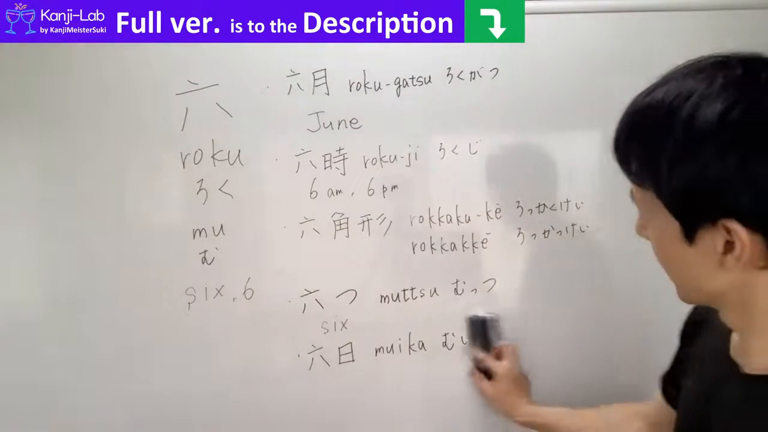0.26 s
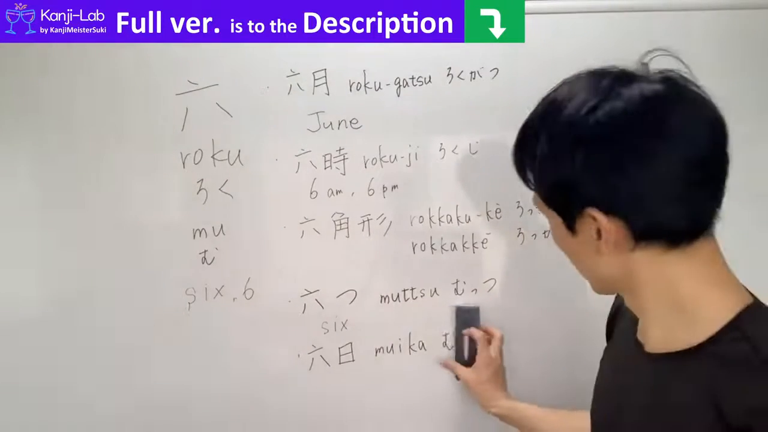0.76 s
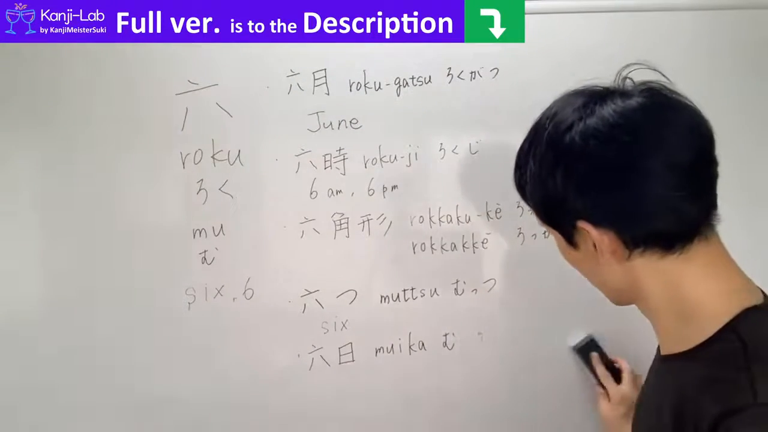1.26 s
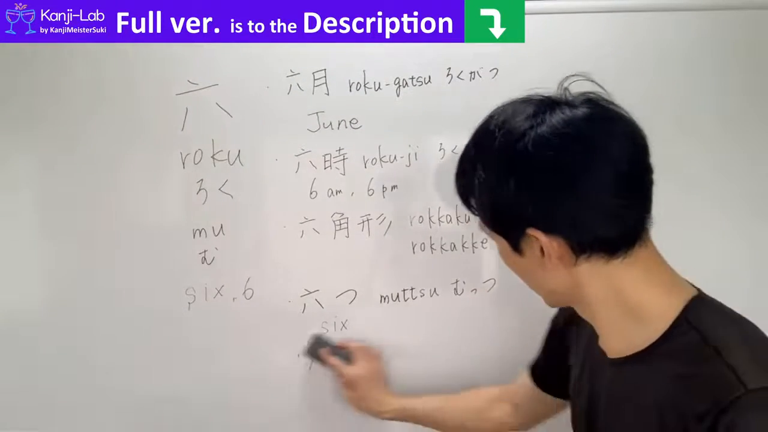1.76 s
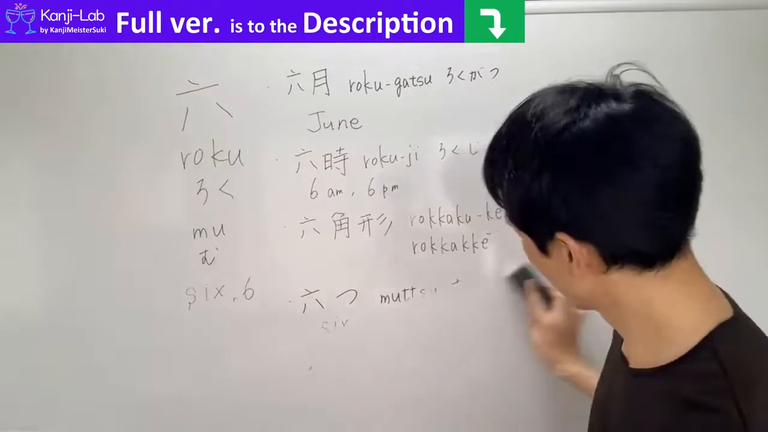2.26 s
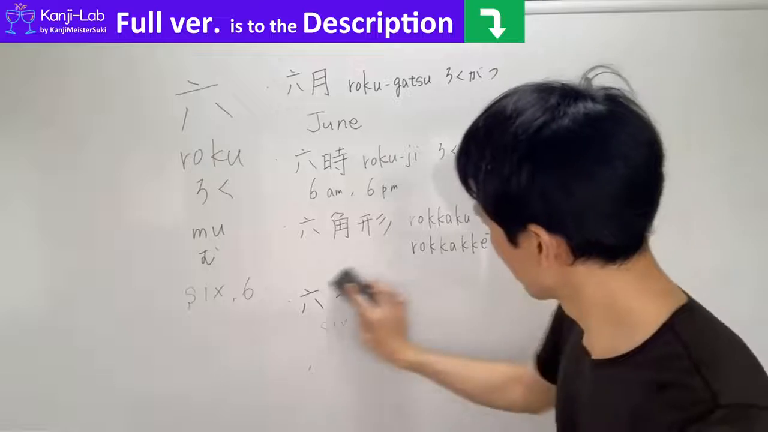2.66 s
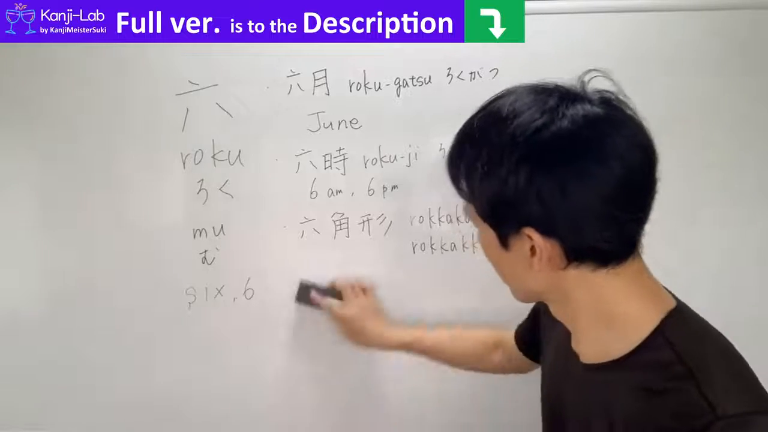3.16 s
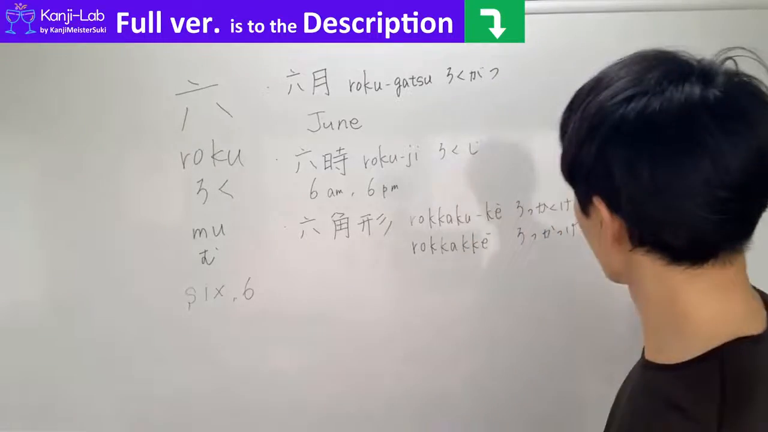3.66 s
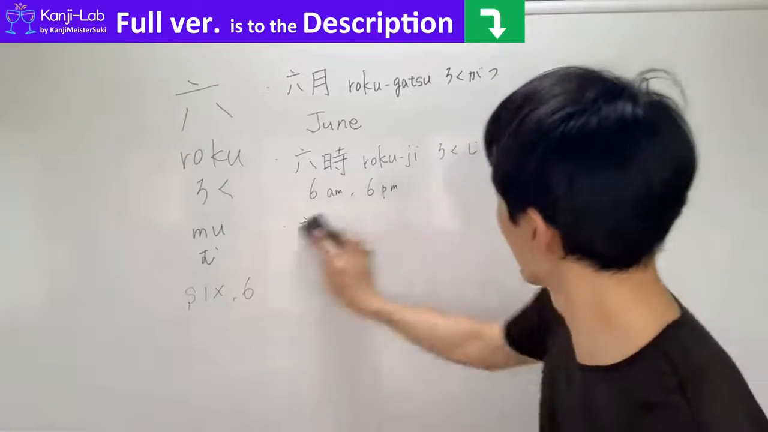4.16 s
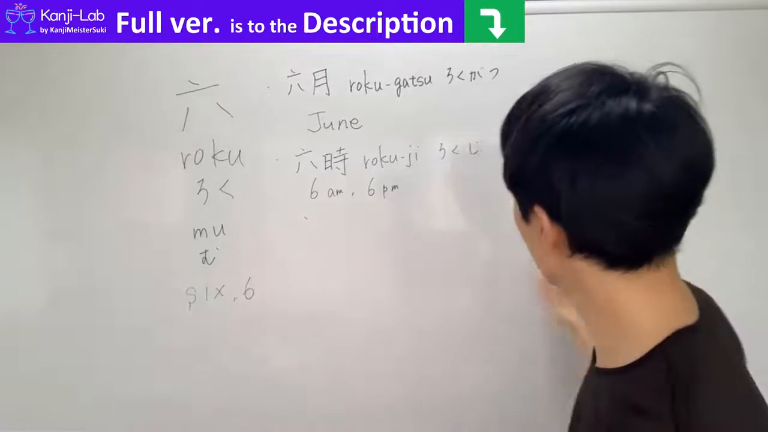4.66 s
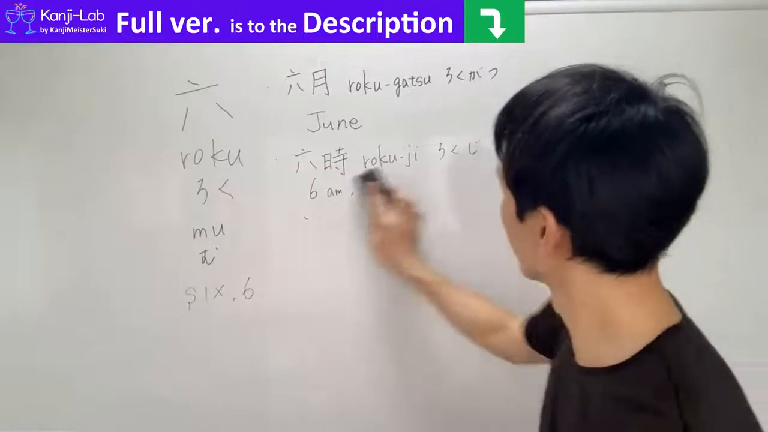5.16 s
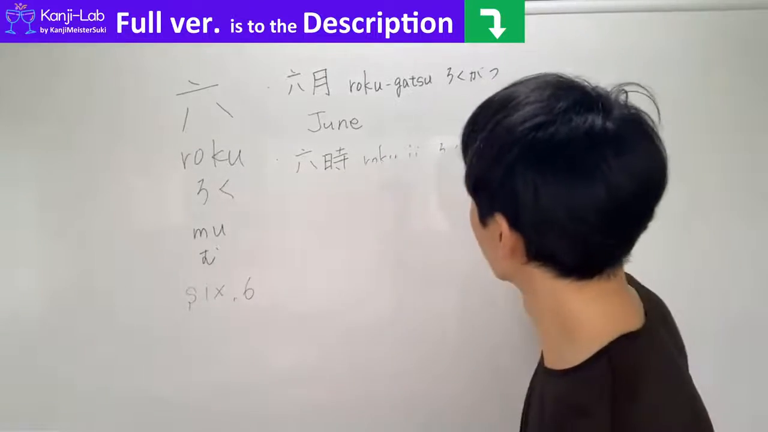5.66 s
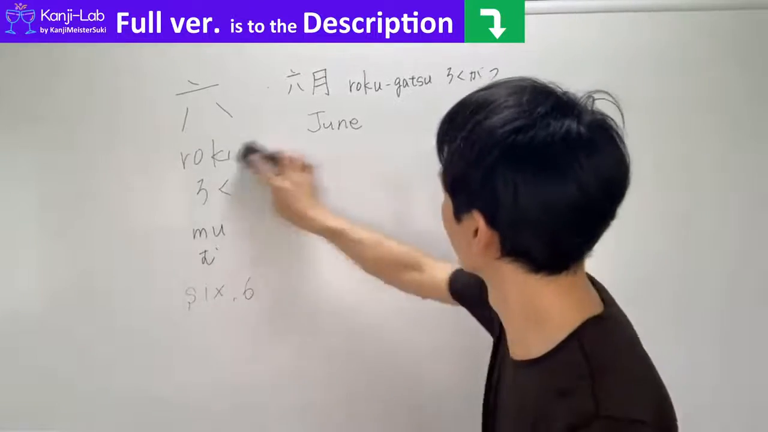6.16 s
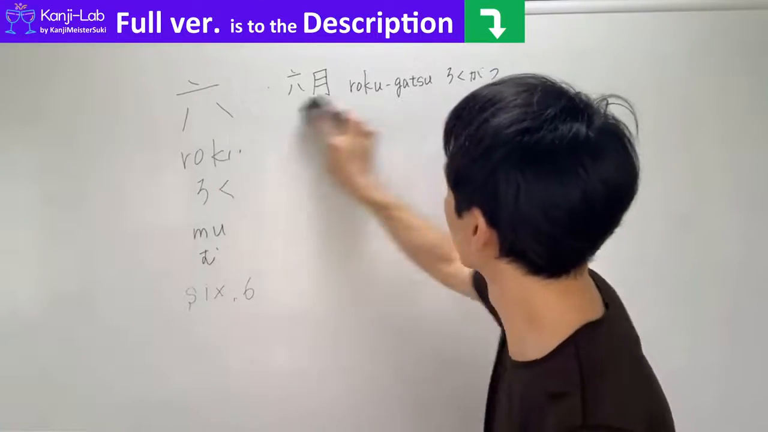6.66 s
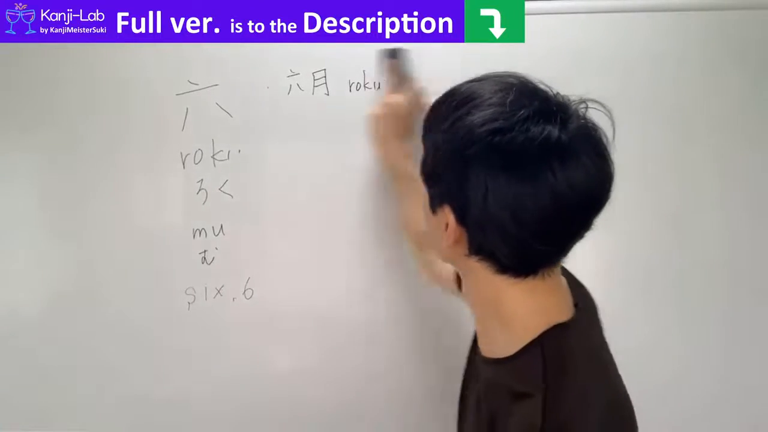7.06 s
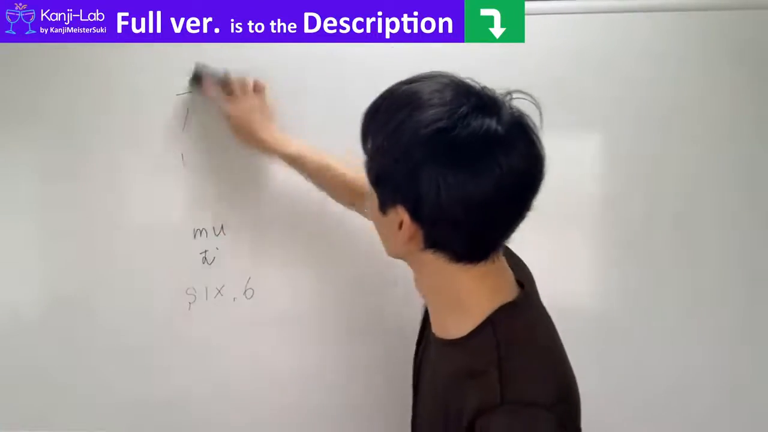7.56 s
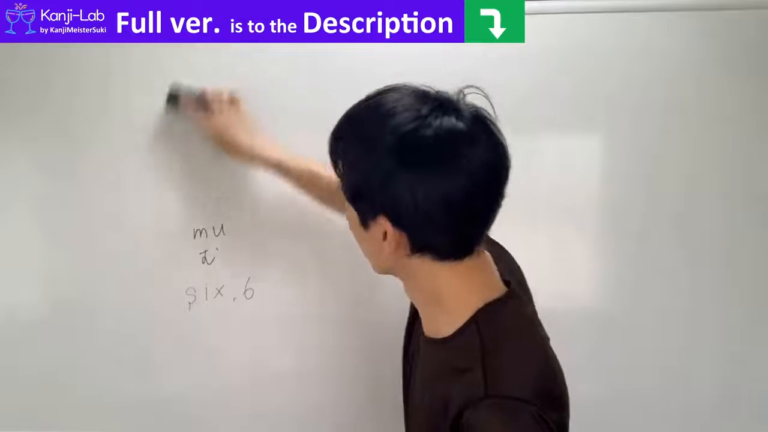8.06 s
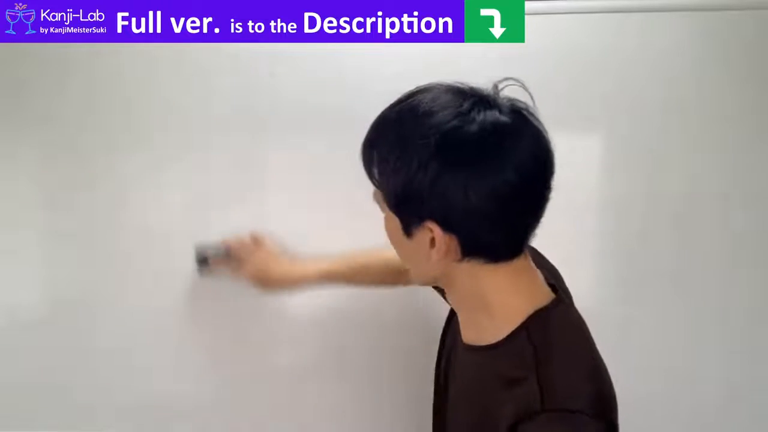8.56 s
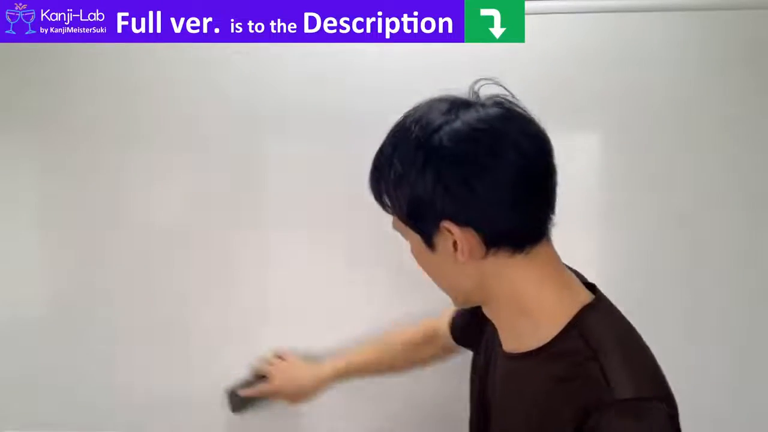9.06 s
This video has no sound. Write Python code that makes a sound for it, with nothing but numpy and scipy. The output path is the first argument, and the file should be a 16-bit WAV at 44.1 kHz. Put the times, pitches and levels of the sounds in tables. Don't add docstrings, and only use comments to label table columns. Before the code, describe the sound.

In a small hard room, faint rubbing leads to a loud, bouncing clack as an eraser hits a wall-hung whiteboard with a low boom. A brief scuffing squeak follows, then soft dry strokes sweep to and fro. The loose panel knocks dully at the turns, more often later. Close microphone, hollow comb-like colour, faint rumble and hiss beneath.

```python
import sys
import numpy as np
from scipy import signal
from scipy.fft import rfft, irfft, next_fast_len
from scipy.io import wavfile

SR = 44100
rng = np.random.default_rng(int(sys.argv[2]) if len(sys.argv) > 2 else 0)


def makeup_ratio(level_db):
    decades = np.asarray(level_db, float) / 20
    return 10 ** decades


def unload_wav(signal):
    wavfile.write(
        sys.argv[1],
        SR,
        np.round(np.clip(np.atleast_2d(signal).T, -1, 1) * 32767).astype(np.int16),
    )


N = 410130

# frequency in Hz, side minus mid in dB.
WIDTH = [(60, -29.5), (120, -12.5), (240, -18), (480, -10), (950, -13), (1890, -11), (3770, -9.5),
         (7520, -5.5), (10300, -6), (11500, -30)]
# frequency in Hz, density in dB per Hz.
RUMBLE_COLOUR = [(12, -56), (20, -47.5), (32, -18), (86, -5.5), (113, 6), (137, 4.5), (156, -6), (189, -24),
                 (220, -5.5), (290, -37), (480, -120)]
# middle in seconds, length in seconds, level in dB.
PUSHES = [
    (0.326, 0.064, -39),
    (.5, 0.34, -53),
    (0.835, 0.074, -50),
    (4.859, .1, -54),
    (5.292, 0.17, -49),
    (6.15, .1, -58),
    (7.0, 0.11, -63),
    (7.502, .12, -58),
    (8.497, 0.71, -61),
]
# frequency in Hz, width in Hz, level in dB.
FAN = (490, 3.6, -65.5)

LAYER_CENTRES_HZ = [600, 2400, 5600, 11000]
# frequency in Hz, density in dB per Hz.
RUB_COLOUR = [(190, -9), (260, -14), (340, -10), (500, -3), (800, -5), (1200, -1.5), (1700, -3.5),
              (2400, -3.5), (3500, -20), (6000, -39.5), (10000, -28), (16000, -36)]
# fastest moment in seconds, length in seconds, level in dB, brightness in dB.
STROKES = [(0.157, 0.25, -45.5, -1.5), (0.272, 0.039, -34, 1), (0.632, 0.11, -47, 1),
           (0.774, 0.074, -43.5, 1.5), (1.448, 0.28, -48, 0), (1.712, 0.29, -48, 0),
           (2.183, 0.38, -49.5, 0), (2.6, 0.27, -47, -0.5), (2.707, 0.19, -47, 0), (3.024, 0.53, -48, -0.5),
           (3.57, 0.2, -49.5, 0), (3.93, 0.25, -48, -1.5), (4.13, 0.34, -46, -1), (4.65, 0.4, -49.5, -1),
           (5.245, 0.39, -47, -0.5), (5.663, .25, -48.5, -0.5), (6.0, 0.26, -46, -0.5),
           (6.268, 0.087, -47, -1), (6.503, 0.23, -53.5, 2.5), (6.78, 0.63, -49.5, -1.5),
           (7.187, 0.22, -47.5, -2), (7.42, 0.21, -47, 1.5), (7.833, 0.48, -47.5, -1.5),
           (8.235, 0.13, -43.5, -1), (8.502, .3, -46.5, -1), (8.803, 0.18, -48, -1.5),
           (9.006, 0.16, -48.5, -1)]
STROKE_LAYERS_DB = [-2.5, -5.5, -7.5, -16]
BRIGHT_SHARES = [-1.43, 0.42, 1.07, 1.3]
SLOWING_DB = [2.8, 3.02, 3.4, 3.46]
STILL_DB = [-54.5, -73, -63, -69]
# start in seconds, level in dB, rise in seconds, fall T60 in seconds,
# brightness in dB.
SKIDS = [
    (.31, -34, 0.035, 0.49, -0.5),
    (0.435, -40, 0.0033, 0.35, -2.5),
    (.89, -57, 0.015, 0.26, -5),
    (4.821, -51.5, 0.041, 0.23, 4.5),
    (4.919, -44, 0.082, 0.27, 0),
    (5.1, -54.5, 0.06, 0.23, 1),
    (5.41, -45.5, 0.023, 0.22, -7),
    (7.07, -55, 0.064, 0.5, 6.5),
    (8.88, -49.5, 0.1, 0.31, -8),
]
SKID_LAYERS_DB = [0, 2, 1.5, -3.5]
# frequency in Hz, width in Hz, lift in dB.
PANEL_PEAKS = [(236.2, 17.3, 12), (321, 16, 9.5), (797.3, 20, 5), (902, 41, 4.5), (1115, 44, 5),
               (2350, 330, 1.5)]
# middle in seconds, length in seconds, level in dB.
MOANS = [
    (0.152, 0.13, -46),
    (0.775, 0.076, -51),
    (2.644, 0.21, -47),
    (2.985, 0.17, -51),
    (4.05, 0.38, -49.5),
    (5.177, 0.6, -54),
    (7.128, .15, -49.5),
    (8.63, 0.12, -50.5),
]

# start in seconds, peak in dB, weight near 400 Hz in dB,
# hardness near 1200 Hz in dB.
LANDING = [
    (.3, -12, -2, 1.5),
    (.307, -13, -6, 0.5),
    (.321, -17, -16, -7),
    (.348, -16.5, 1, -2),
    (.395, -30, 0, -8),
    (.432, -26, -1, -6),
]
# start in seconds, peak in dB, weight near 400 Hz in dB,
# hardness near 1200 Hz in dB.
KNOCKS = [(0.578, -54.5, -5, 16), (1.224, -26, -10, -6), (1.26, -33, 8, 4), (1.94, -29.5, 0.5, -6),
          (2.375, -25, -2, -4), (3.169, -33, 11, 1), (3.187, -32, 5, 5), (3.238, -39.5, -5, 4),
          (4.373, -35.5, -2, -21), (4.384, -29, -9, -2), (4.814, -30, 8.5, -2), (4.849, -33, 8.5, 6),
          (5.385, -21.5, -7.5, -1), (5.428, -30, 1.5, 2), (5.755, -26, -4, 0), (6.096, -24.5, -3.5, 0.5),
          (6.366, -25, -16, -5), (6.574, -22.5, -1.5, -2.5), (6.592, -33.5, -6, 4), (6.913, -29, 3, 1.5),
          (6.939, -26, -10, -2), (7.089, -27, -13, -13), (7.44, -28, -1, -2.5), (7.878, -30, -27, -0.5),
          (8.038, -35, 1, -1.5), (8.477, -29, -4, 0), (8.683, -25, -6, -2), (8.862, -23, -2, -4),
          (8.883, -39.5, -5, 3)]
KNOCK_CENTRES_HZ = [400, 800, 1200, 2200]
# frequency in Hz, T60 in seconds.
PANEL_T60 = [(200, 0.46), (400, 0.33), (800, 0.32), (1500, 0.19), (4000, 0.42)]
# frequency in Hz, level in dB.
KNOCK_COLOUR = [(200, -10.5), (260, -14.5), (330, -7.5), (420, -1.5), (1600, 2), (2500, -2), (4500, -16.5),
                (9000, -44)]

# start in seconds, peak in dB,
# frequency in Hz.
QUICK_RINGS = [(0.3004, -5, 421), (.3003, -10.5, 832), (.34, -23, 262), (.345, -24.5, 545),
               (.335, -19.5, 810), (.347, -17.5, 740), (.383, -26, 425), (.317, -21.5, 1190),
               (.361, -24, 430), (.371, -27, 419), (.396, -24, 817), (.366, -27.5, 800),
               (2.368, -34.5, 1173), (2.376, -42, 1480), (2.372, -31.5, 786), (2.39, -30, 504),
               (6.574, -34, 1560), (6.574, -34, 390), (6.594, -34, 366), (6.592, -32, 1140),
               (6.6, -39, 785), (6.622, -38, 730), (8.868, -29, 1314), (8.9, -32, 889), (8.938, -43, 885),
               (8.971, -40, 895), (8.968, -41, 444), (1.265, -36.5, 362.3), (1.935, -37, 780),
               (2.374, -29, 418), (2.374, -26, 893), (4.403, -34, 860), (4.432, -39, 850),
               (4.813, -33, 378), (4.828, -31.5, 395), (4.822, -37, 760), (4.945, -38, 500),
               (5.775, -29, 468), (6.094, -27.5, 730), (6.385, -33, 450), (6.571, -26, 1108),
               (6.574, -25, 770), (6.95, -29, 500), (7.44, -28, 495), (7.877, -30.5, 940),
               (8.681, -28.5, 486), (8.685, -27, 1036), (8.69, -33.5, 426)]
# start in seconds, peak in dB, frequency in Hz.
FREE_RINGS = [(0.306, -11, 511), (0.309, -13, 240), (.337, -20, 707), (.341, -12, 417), (.344, -31, 1203),
              (.345, -16, 520), (1.235, -29, 800), (1.274, -40, 398.5), (1.937, -40, 385),
              (1.938, -35.5, 495), (2.332, -43.5, 436), (2.407, -38, 440), (3.183, -36, 389),
              (4.847, -57, 420), (4.851, -33, 504), (4.9, -32.5, 502), (5.244, -44, 319),
              (5.383, -32.5, 746), (5.385, -33.5, 368), (5.428, -30.5, 494), (5.432, -35.5, 1188),
              (5.795, -40, 400), (6.095, -35.5, 1105), (6.363, -42, 735), (6.425, -44.5, 420),
              (6.922, -36.5, 720), (7.299, -43, 311), (7.461, -37.5, 321), (8.481, -41.5, 748),
              (8.484, -29, 321), (8.86, -33, 410), (8.884, -33, 399), (8.866, -35, 857)]
# start in seconds, peak in dB, frequency in Hz.
BOUNCES = [(0.3079, -6, 416), (.3075, -7, 802), (.3185, -14, 430), (.3195, -7, 782), (.33, -16, 470),
           (0.37, -16.5, 800), (.394, -17.5, 430), (0.36, -23, 830), (.345, -10, 425), (1.2235, -28, 810),
           (1.272, -27, 420), (3.169, -31, 1160), (3.168, -38, 800), (3.169, -30, 340), (3.187, -23, 391),
           (3.204, -26, 356), (3.205, -42, 1585), (3.236, -29.5, 490), (2.6, -42, 540), (5.385, -28.5, 392),
           (5.389, -30, 990), (5.393, -27, 870), (5.442, -35, 860), (8.036, -36, 830), (8.049, -38, 804),
           (8.051, -40, 1180), (6.094, -26, 1145), (6.113, -33, 1130), (6.14, -36, 800), (6.927, -31, 1200),
           (6.93, -30, 855), (6.913, -31, 420), (6.998, -37, 1150), (5.758, -31, 1130), (6.415, -38, 800),
           (7.128, -39, 796), (7.163, -40, 820), (6.8, -33, 850), (3.19, -34, 800), (3.228, -38, 1100),
           (3.249, -40, 1200), (4.385, -21, 860), (4.377, -37, 795), (4.095, -36, 820), (4.874, -32, 485),
           (4.5, -38, 795), (4.86, -39, 1150), (8.8695, -24.5, 850), (8.886, -29, 407), (8.892, -35, 1210),
           (8.915, -40, 1240), (6.364, -28, 760), (6.373, -26.5, 860), (6.396, -34, 866), (6.404, -35, 800),
           (6.371, -38.5, 1600), (6.921, -31, 730), (6.937, -32, 383), (6.956, -33, 500), (6.971, -32, 520),
           (.3003, -12, 790), (.3235, -9, 760), (1.225, -37, 1600), (1.232, -35, 450), (1.232, -39, 1950),
           (1.303, -35, 400), (5.758, -29, 730), (5.784, -32, 480), (8.49, -33, 740), (8.492, -37, 1150),
           (8.706, -33, 500), (4.386, -38, 1550), (4.815, -36, 1200)]
# start in seconds, peak in dB, frequency in Hz, T60 in seconds.
SQUEAK = [(.874, -35, 2500, .11), (.889, -45, 2240, 0.12), (.89, -38, 2770, 0.12), (.898, -40, 2470, 0.14),
          (.899, -39, 507, .24), (.906, -41, 2025, 0.26), (.914, -42, 2290, .094), (.93, -46, 2450, 0.23),
          (.876, -44, 4800, .05), (.902, -48, 4800, .07), (.902, -45, 4000, .08), (.926, -52, 3980, .12)]
# start in seconds, peak in dB, centre in Hz, T60 in seconds,
# half width in octaves.
TICKS = [(.306, -11.5, 2500, 0.065, 0.47), (0.3, -17, 4040, 0.05, 1.5), (0.4315, -19, 4000, 0.03, 1.6),
         (.309, -22, 6500, .05, .8), (.32, -26, 8000, .04, .5), (.376, -27, 4800, .03, .4),
         (0.867, -29, 1300, 0.034, .7), (2.472, -36, 2300, .06, .5), (7.03, -42, 11000, .1, .3),
         (7.064, -36, 8450, 0.07, 0.45), (7.3, -39, 900, 0.041, 1), (4.815, -39, 1710, 0.14, 0.31),
         (5.386, -28, 1960, 0.062, 0.22)]
# start in seconds, peak in dB, centre in Hz, T60 in seconds,
# half width in octaves.
SCUFFS = [(.572, -31, 2000, 0.12, 0.47), (.6, -31.5, 2460, 0.17, .2), (.638, -35.5, 1660, .1, 0.26),
          (.868, -43, 6100, 0.24, 0.7), (.89, -41, 4300, 0.24, 0.33), (.866, -28.5, 2430, .3, .25),
          (7.055, -37, 7500, .15, .5), (5.405, -35, 2170, 0.28, 0.22), (4.852, -39, 2000, .2, .1),
          (4.87, -37, 1600, 0.22, .1), (4.845, -36, 1050, .15, .2), (.89, -30, 2360, 0.34, 0.25),
          (2.352, -38, 1300, 0.091, 0.88), (2.364, -30, 1500, 0.066, 0.59), (8.862, -39, 3700, .12, 0.41),
          (9.278, -46, 2500, .2, 0.19)]
# start in seconds, peak in dB, frequency in Hz, T60 in seconds.
BOOMS = [
    (.31, -20, 124, 0.38),
    (.599, -52, 117.5, 0.29),
    (3.19, -47.5, 125.4, 0.52),
    (4.82, -63, 127, .4),
    (5.208, -46, 91.6, 0.61),
    (5.269, -43, 92, 0.52),
    (6.114, -42, 120, 0.24),
    (7.49, -38, 127, 0.37),
    (7.869, -53, 84, 0.58),
    (8.5, -43, 126.8, 0.68),
]
# frequency in Hz, gain as a ratio.
COPY_GAIN = [(400, 1), (4000, 0.73), (15000, 0.79)]

ROOM_RUMBLE_DB, PUSH_SLOWING_DB = -61, 6.5
BUZZ_DB, BUZZ_T60_S = -27, 0.42
MOAN_HZ, MOAN_WIDTH_HZ, MOAN_SLOWING_DB = 838, 155, 14
TOP_LOSS_DB = -11.5
SOFTENING = 0.45
QUICK_T60_S, FREE_T60_S, BOUNCE_T60_S = 0.082, 0.2, 0.045
PANEL_LOW_HZ = 110
HISS_DB, HISS_LOW_HZ = -85, 2500
COPY_LAG_S = 121 / 48000
MIC_LOW_HZ, CUTOFF_HZ = 45, 15740


def rms_one(x):
    return x / np.sqrt(np.mean(x ** 2) + 1e-20)


def at_hz(points, hz):
    points_hz, values = np.array(points).T
    return np.interp(np.log(hz), np.log(points_hz), values)


def blend(centres_hz, hz):
    return np.array([np.interp(np.log(hz), np.log(centres_hz), row) for row in np.eye(len(centres_hz))])


def bandpass(x, edges_hz, order=2):
    return signal.sosfilt(signal.butter(order, edges_hz, "band", fs=SR, output="sos"), x)


def side_offset_db(hz):
    return np.array([[0], [at_hz(WIDTH, hz)]])


def bands(edges_hz, spectrum, white):
    for k, (low, high) in enumerate(zip(edges_hz, edges_hz[1:])):
        hz = np.sqrt(low * high)
        yield hz, bandpass(white[k % 2], [low, high]) * makeup_ratio(at_hz(spectrum, hz) + side_offset_db(hz))


def drift(rate_hz):
    r = np.exp(-80 * np.pi * rate_hz / SR)
    slow = signal.lfilter([1], [1, -2 * r, r * r], rng.standard_normal(N // 40 + 2002))[2000:]
    return np.interp(np.arange(N) / 40, np.arange(len(slow)), rms_one(slow))


def control_s():
    return np.arange(0, N + 64, 64) / SR


def arch(middle_s, length_s):
    return (2 * (control_s() - middle_s) / max(length_s, 0.02)) ** 2


def spike_db(start_s, rise_s, t60_s):
    t = control_s() - start_s
    return np.where(t < 0, 20 * t / max(rise_s, 0.002), -60 * t / max(t60_s, 0.05))


def summed_db(parts_db):
    total = np.atleast_2d(10 * np.log10(sum(makeup_ratio(part) ** 2 for part in parts_db)))
    return np.array([np.interp(np.arange(N) / 64, np.arange(len(row)), row) for row in total])


def add(out, start_s, sound):
    i = round(start_s * SR)
    out[:, i:i + sound.shape[1]] += sound[:, :N - i]


def rumble():
    white = rng.standard_normal((2, 2, N))
    low = sum(pair for hz, pair in bands(np.geomspace(20, 230, 9), RUMBLE_COLOUR, white))
    pushes = [db - PUSH_SLOWING_DB * arch(s, length_s) for s, length_s, db in PUSHES]
    level_db = summed_db([ROOM_RUMBLE_DB] + pushes)
    return makeup_ratio(level_db - 9.0) * rms_one(low) * np.sqrt(2)


def fan():
    hz, width_hz, db = FAN
    r = np.exp(-np.pi * width_hz / SR)
    resonance = [1, -2 * r * np.cos(2 * np.pi * hz / SR), r * r]
    hum = signal.lfilter([1, 0, -1], resonance, rng.standard_normal(N))
    return makeup_ratio(db) * rms_one(hum) * [[0], [1]]


def hiss(size):
    mid, side = bandpass(rng.standard_normal((2, size)), [HISS_LOW_HZ, 9000], order=1)
    return makeup_ratio(HISS_DB) * np.array([mid + 0.23 * side, mid - 0.28 * side])


def wipe_levels():
    per_layer = np.array([STROKE_LAYERS_DB, BRIGHT_SHARES, SLOWING_DB, STILL_DB, SKID_LAYERS_DB])
    stroke, bright, slowing, still, skid = per_layer[..., None]
    drone_only = np.array([[0], [-30], [-90], [-90]])
    strokes = [db + stroke + bright * tilt_db - slowing * arch(s, length_s)
               for s, length_s, db, tilt_db in STROKES]
    skids = [db + skid + bright * tilt_db + spike_db(s, rise_s, t60_s)
             for s, db, rise_s, t60_s, tilt_db in SKIDS]
    buzz = [db + BUZZ_DB + drone_only + spike_db(s, 0.0018, BUZZ_T60_S)
            for s, db, *colour in LANDING + KNOCKS]
    return summed_db([still] + strokes + skids + buzz)


def rubbing(grain_db, judder_db, patchy_db):
    slip_db = grain_db * np.minimum(rng.exponential(1, N), 4)
    white = rng.standard_normal((2, 2, N)) * makeup_ratio(slip_db)
    levels_db, judder = wipe_levels(), judder_db * drift(27)
    parts = list(bands(np.geomspace(190, 17000, 17), RUB_COLOUR, white))
    shares = blend(LAYER_CENTRES_HZ, [hz for hz, pair in parts])
    power = np.array([np.mean(pair[0] ** 2) for hz, pair in parts])
    main_layer = shares.argmax(axis=0)
    usual_db = 10 * np.log10([power[main_layer == k].sum() for k in range(len(shares))])
    gain_db = levels_db - usual_db[:, None]
    out = np.zeros((2, N))
    for share, (hz, pair) in zip(shares.T, parts):
        out += pair * makeup_ratio(share @ gain_db + judder + patchy_db * drift(8.7))
    return out


def through_panel(x):
    hz = np.arange(N // 2 + 1) * SR / N
    lift_db = sum(db / (1 + (2 * (hz - centre_hz) / width_hz) ** 2) for centre_hz, width_hz, db in PANEL_PEAKS)
    return irfft(rfft(x) * makeup_ratio(lift_db), N)


def moan():
    edges_hz = [MOAN_HZ - MOAN_WIDTH_HZ / 2, MOAN_HZ + MOAN_WIDTH_HZ / 2]
    noise = bandpass(rng.standard_normal((2, N)), edges_hz)
    level_db = summed_db([-120] + [db - MOAN_SLOWING_DB * arch(s, length_s) for s, length_s, db in MOANS])
    return rms_one(noise) * makeup_ratio(level_db + side_offset_db(MOAN_HZ))


def knocks(rise_s, quick_s, quick_db, spread_db, gain_db):
    out, t = np.zeros((2, N)), np.arange(SR // 2) / SR
    hz = np.geomspace(200, 9000, 150) * rng.uniform(0.99, 1.01, 150)
    modes = np.exp(2j * np.pi * hz[:, None] * t) * makeup_ratio(-60 * t / at_hz(PANEL_T60, hz)[:, None])
    shares = blend(KNOCK_CENTRES_HZ, hz)
    mid_side = np.array([np.ones(len(hz)), makeup_ratio(at_hz(WIDTH, hz))])
    for s, peak_db, weight_db, hard_db in LANDING + KNOCKS:
        turns, uneven = rng.random((2, len(hz))), rng.random(len(hz))
        colour_db = np.array([weight_db, 0, hard_db, hard_db + TOP_LOSS_DB])
        level_db = peak_db + colour_db @ shares + at_hz(KNOCK_COLOUR, hz)
        size = makeup_ratio(level_db + gain_db + spread_db * (2 * uneven - 1.5)) * mid_side
        swell_s = rise_s * makeup_ratio(-SOFTENING * peak_db)
        shape = (1 - np.exp(-t / swell_s)) ** 2 * (1 + makeup_ratio(quick_db) * np.exp(-t / quick_s))
        add(out, s - swell_s, shape * (size * np.exp(2j * np.pi * turns) @ modes).real)
    return out


def single_modes(table, rise_cycles, gain_db, side_db):
    out, t = np.zeros((2, N)), np.arange(SR // 2) / SR
    for s, peak_db, hz, t60_s in table:
        swell = 1 - np.exp(-t * hz / rise_cycles)
        decay = makeup_ratio(peak_db + gain_db - 60 * t / max(t60_s, 0.04))
        tone = np.exp(2j * np.pi * hz * t) * swell * decay
        add(out, s, np.array([tone.imag, tone.real * makeup_ratio(at_hz(WIDTH, hz) + side_db)]))
    return out


def panel_rings():
    modes = [(*row, QUICK_T60_S) for row in QUICK_RINGS]
    modes += [(*row, FREE_T60_S) for row in FREE_RINGS] + SQUEAK
    modes += [(*row, BOUNCE_T60_S) for row in BOUNCES]
    return single_modes(modes, rise_cycles=0.61, gain_db=1.5, side_db=-0.5)


def ticks(table, rise_s, gain_db):
    out, t = np.zeros((2, N)), np.arange(SR // 3) / SR
    for s, peak_db, hz, t60_s, octaves in table:
        edges_hz = hz * 2.0 ** (max(octaves, 0.05) * np.array([-1, 1]))
        edges_hz = np.minimum(edges_hz, [12000, 18000])
        noise = rms_one(bandpass(rng.standard_normal((2, len(t))), edges_hz))
        noise[1] = signal.lfilter([0.5, 0.5], [1], noise[1])
        shape = makeup_ratio(-60 * t / max(t60_s, 0.01)) * np.minimum(t / rise_s, 1)
        add(out, s, noise * shape * makeup_ratio(peak_db + gain_db + side_offset_db(hz)))
    return out


def scene():
    rub = through_panel(rubbing(grain_db=1.5, judder_db=0.74, patchy_db=0.6))
    blows = knocks(rise_s=0.000999, quick_s=0.0059, quick_db=-0.5, spread_db=7.5, gain_db=-18.5)
    low_cut = signal.butter(2, PANEL_LOW_HZ, "high", fs=SR, output="sos")
    panel = signal.sosfilt(low_cut, rub + blows + panel_rings())
    booms = single_modes(BOOMS, rise_cycles=2.8, gain_db=1.5, side_db=-16.5)
    hard_back = ticks(TICKS, rise_s=0.00074, gain_db=-8.5) + ticks(SCUFFS, rise_s=0.01, gain_db=-6.5)
    mid, side = rumble() + fan() + panel + moan() + hard_back + booms
    return np.array([mid + side, mid - side])


def band_limit(x):
    return signal.sosfilt(signal.butter(12, 15750, fs=SR, output="sos"), x)


def record(dry):
    size = next_fast_len(N + 1000)
    hz = np.arange(size // 2 + 1) * SR / size + 1e-9
    late = np.minimum(at_hz(COPY_GAIN, hz), 1) * np.exp(-2j * np.pi * hz * COPY_LAG_S)
    twice = irfft(rfft(dry, size) * (1 + late), size) / np.sqrt(2)
    twice = np.clip(twice, -0.93, 0.97)
    response = (hz < CUTOFF_HZ) / np.sqrt(1 + (MIC_LOW_HZ / hz) ** 4)
    mix = irfft(rfft(twice + hiss(size), size) * response, size)[:, :N]
    return band_limit(mix)


dry = scene()
out = record(dry)
unload_wav(out)
```